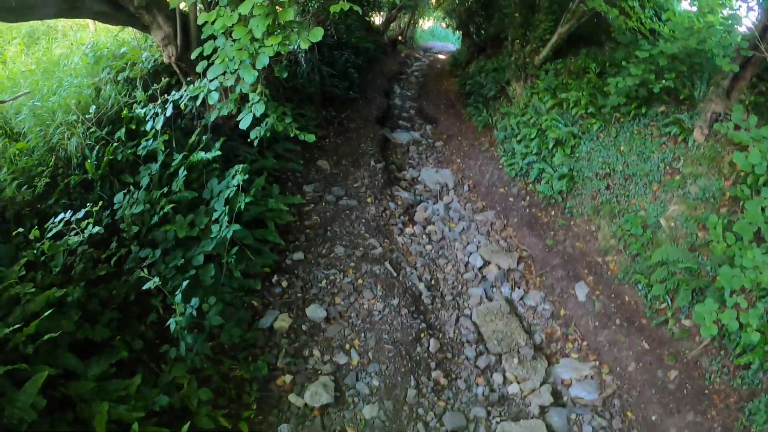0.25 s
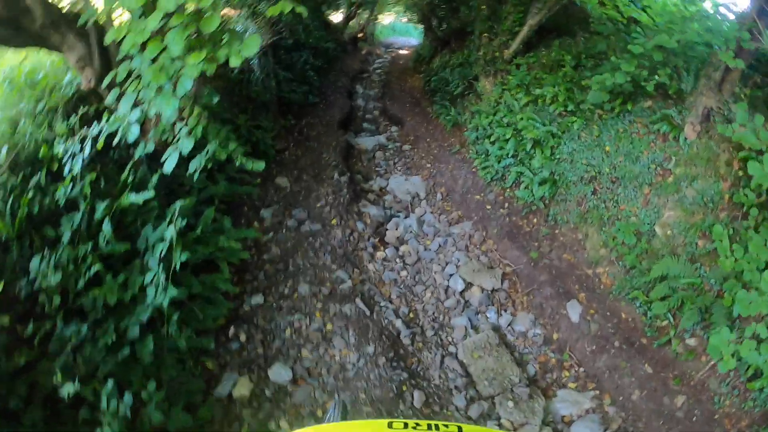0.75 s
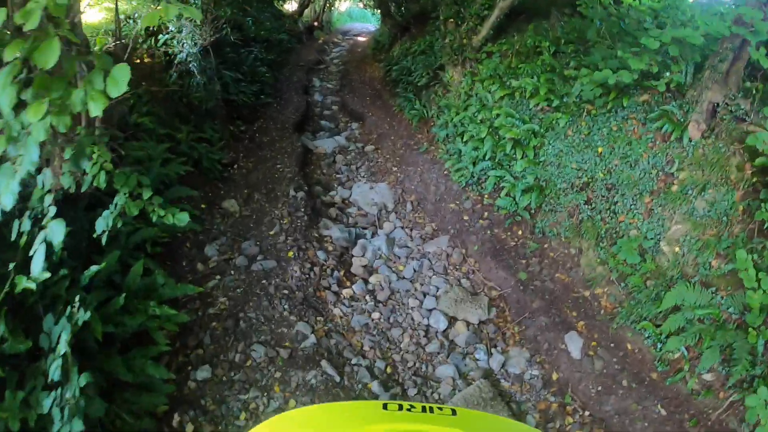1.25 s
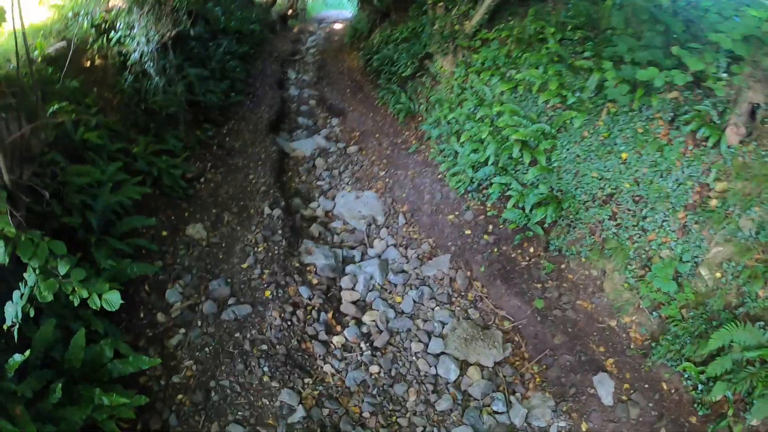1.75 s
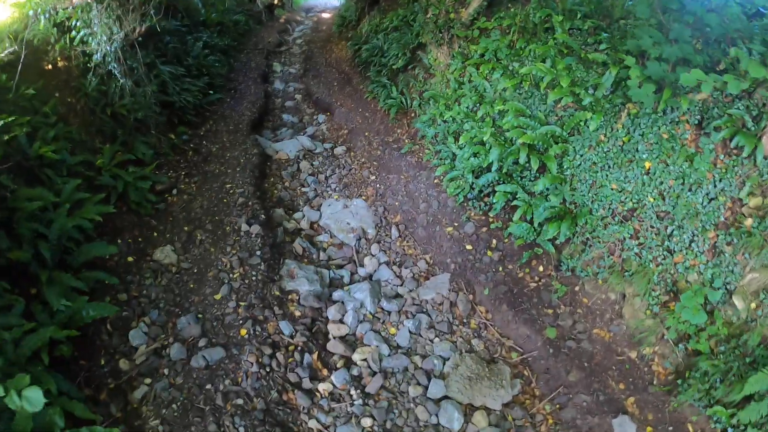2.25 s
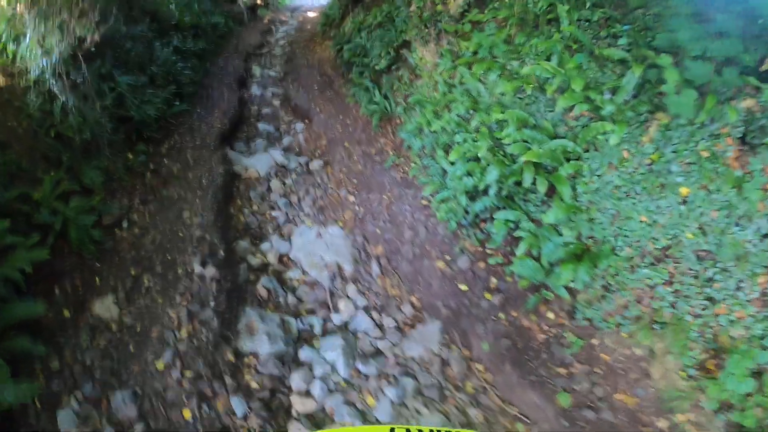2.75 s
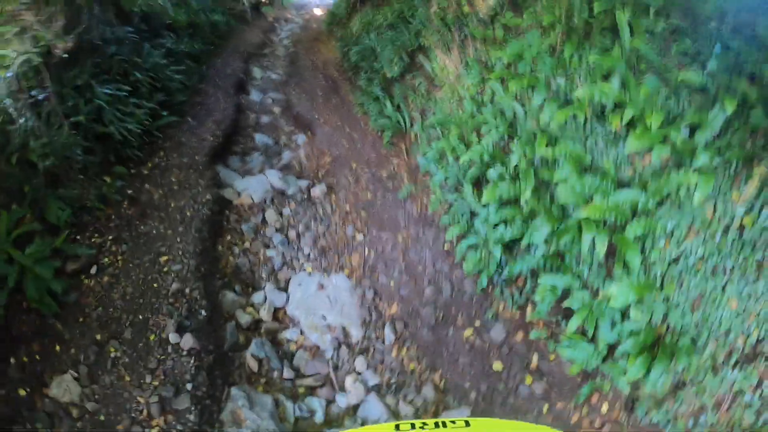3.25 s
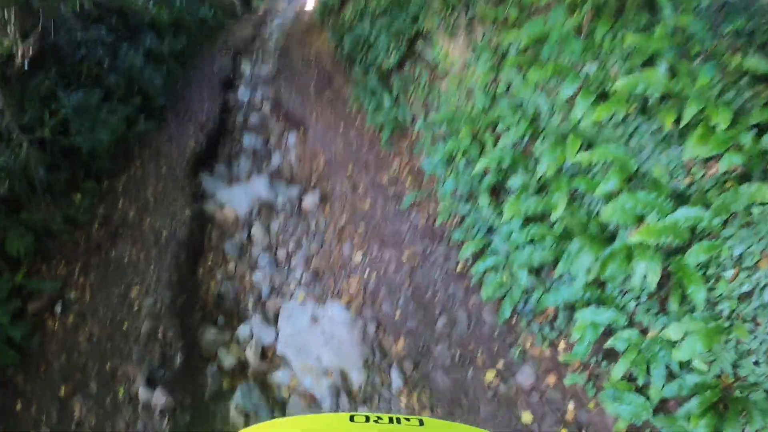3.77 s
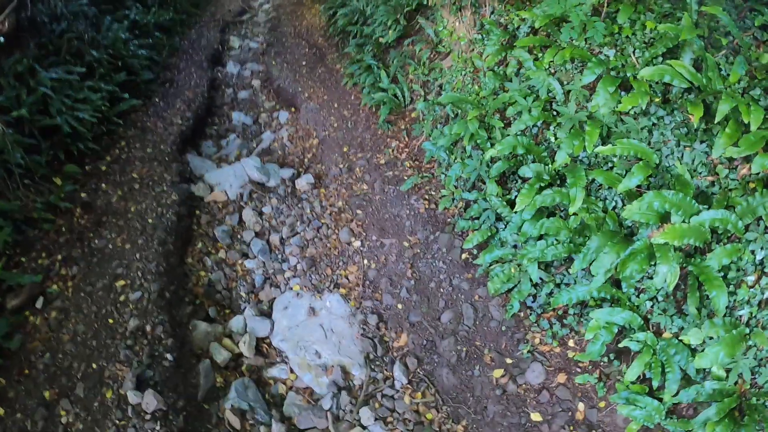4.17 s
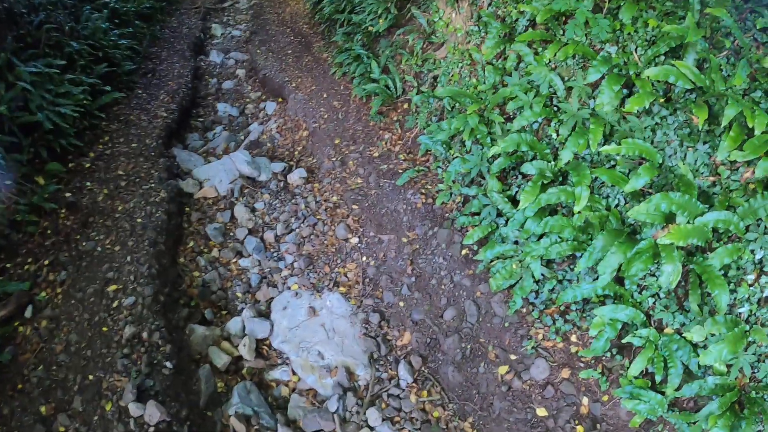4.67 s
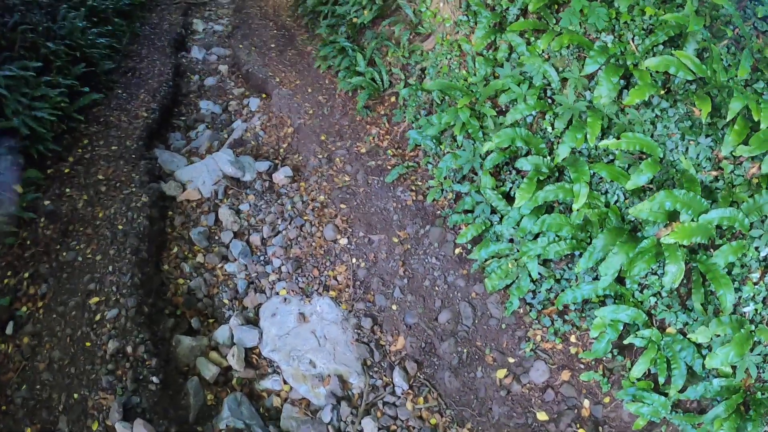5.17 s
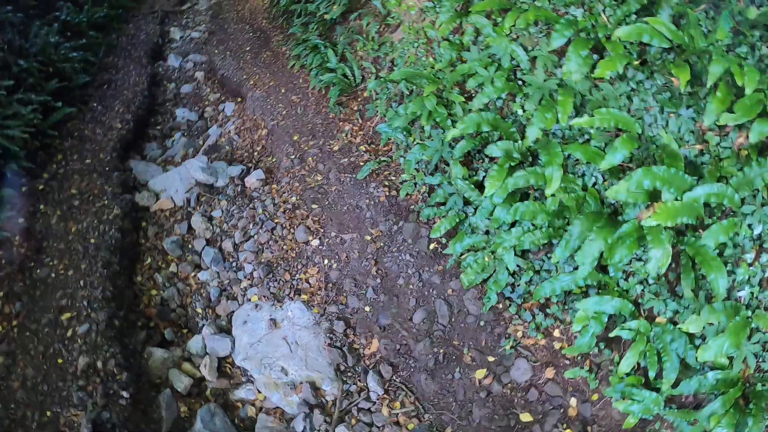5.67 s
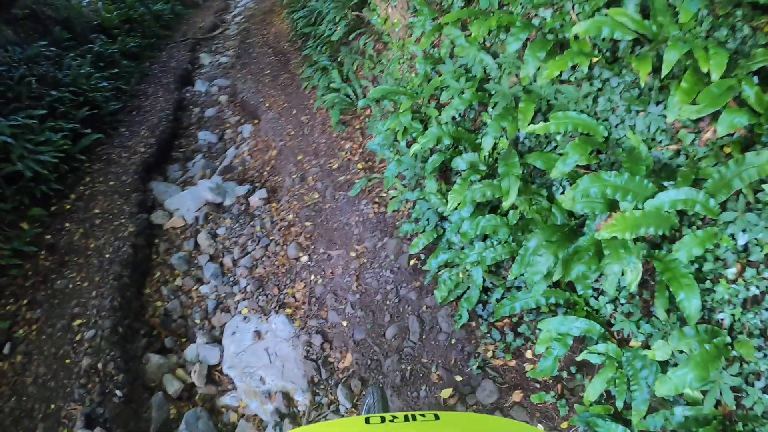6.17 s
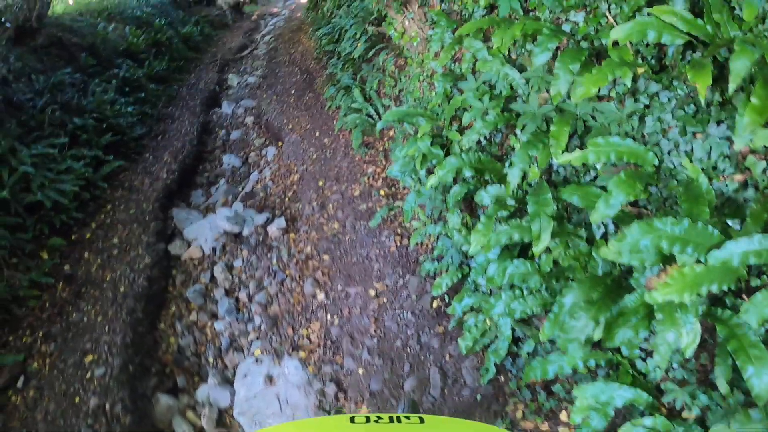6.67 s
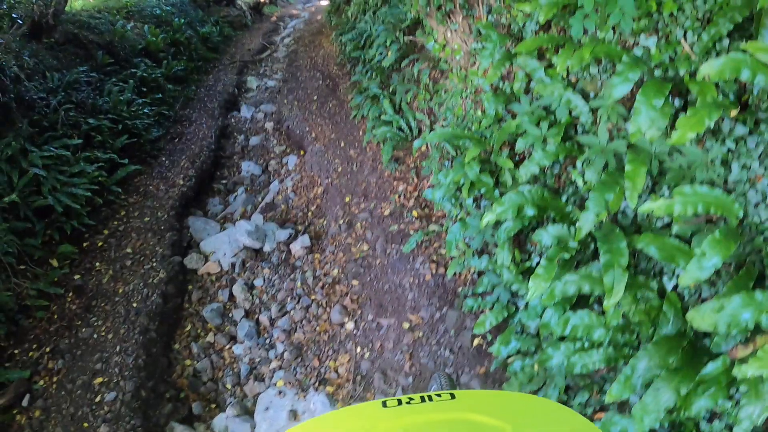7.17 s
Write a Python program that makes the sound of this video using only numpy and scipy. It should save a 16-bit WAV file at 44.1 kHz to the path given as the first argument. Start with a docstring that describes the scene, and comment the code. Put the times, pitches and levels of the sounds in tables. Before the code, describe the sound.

A mountain bike picks its way over loose stones on a wooded track. Irregular hard knocks ring the bike briefly, with dull chatter, pebble ticks, tyre thuds and gravel crunch. A dense opening burst eases, a longer busy one follows, then only scattered clacks while a small bird whistles faintly. Close microphones on the rider pick up a deep lumpy rumble of air and shaking.

```python
"""Stones clack against a mountain bike as it picks its way down a rocky gully; the rider wears two microphones.
Each knock is a jerky burst of noise that rings the bike; pebbles, loose parts and squeaks add small sounds.
The tyres thud as decaying low tones, and crunch and drum as showers of clicks coloured by filters.
Air and shaking rumble underneath as low-filtered clicks.
Towards the end a small bird sings faintly in the trees, as gliding tones with an echo of fading noise."""
import sys
import numpy as np
from scipy import signal
from scipy.fft import rfft, irfft, next_fast_len
from scipy.io import wavfile
from scipy.ndimage import uniform_filter1d

SR = 44100
rng = np.random.default_rng(int(sys.argv[2]) if len(sys.argv) > 2 else 0)


def unload_wav(signal):
    """Save mono or channel-first audio to the path in sys.argv[1] as 16-bit WAV at rate SR, clipped to [-1, 1]."""
    wavfile.write(
        sys.argv[1],
        SR,
        np.round(np.clip(np.atleast_2d(signal).T, -1, 1) * 32767).astype(np.int16),
    )


N = 327222
TIME = np.arange(N) / SR


# stones knocking the bike: (t/s, clack level/dB, deep body over clack/dB, click over clack/dB,
# contact/ms, f/Hz at which the struck spot answers most)
STONE_KNOCKS = [(0.2748, -43.5, 0, -7, 3.3, 1180), (0.425, -32, -2, -10.5, 3.4, 1235),
                (0.4536, -42.5, -12, -3.5, 1.1, 1295), (0.5311, -28.5, -6.5, -12, 2, 1217),
                (0.6498, -28, -9.5, -7.5, 2.5, 1160), (0.6792, -36.5, 3.5, -9.5, 1.2, 1050),
                (0.7165, -25.5, 1.5, -6, 3.3, 1107), (0.878, -27.5, 2.5, -13, 9.5, 1140),
                (0.898, -37.5, 2, -5, 3.2, 1337), (0.9713, -36.5, 3.5, -22, 4.9, 1090.0),
                (1.06, -35.5, 0.5, -9, 6.5, 1683), (1.0756, -27.5, -2, -15, 5.7, 920),
                (1.1386, -41, 3.5, -11.5, 8.5, 1032), (1.3004, -39, -4.5, -17, 0.94, 1080),
                (1.3319, -32, -3, -14.5, 2.7, 1008), (1.5222, -34, 5, -12.5, 3.26, 1176),
                (2.652, -33.5, -3, -12, 2.9, 706), (2.7854, -37.5, 0, -15, 4.9, 1017),
                (2.8511, -33.5, 0, -7.5, 8.5, 816), (2.8745, -28.5, 0.5, -6.5, 4.55, 1148),
                (2.968, -45, 8, -8.5, 9.5, 1140), (3.0046, -32.5, 1, -13, 4.1, 1210),
                (3.1301, -39, 3.5, -11, 2.5, 1140), (3.22, -33.5, -3.5, -5, 1.4, 1290),
                (3.2437, -32.5, 6, -10.5, 5.9, 1040), (3.2989, -33, 3.5, -12.5, 2.2, 937),
                (3.3955, -34, -14.5, -10, 0.97, 1200), (3.4012, -37.5, 9, -15, 7.8, 903),
                (3.4294, -30.5, 5.5, -12.5, 10, 1236), (3.4946, -38.5, -2.5, -46, 5.4, 1290),
                (3.609, -38, 4, -11.5, 3.1, 1270), (3.645, -34, 5.5, -13, 4.2, 1170),
                (3.6875, -27, 0, -10, 3, 1150), (3.696, -35, 11, -16.5, 8.3, 1070),
                (3.8222, -36, 5, -35, 4.6, 975), (3.922, -38, 7.5, -8, 1.7, 1200),
                (3.9768, -37.5, -5.5, -10, 3.5, 1250), (4, -40.5, -1.5, -8.5, 5, 1280),
                (4.0495, -41.5, 9.5, -9.5, 1.4, 1000), (4.06, -43.5, 7.5, -17, 4.4, 990),
                (4.0902, -45.5, -1.5, -4, 4.4, 1030), (4.1307, -43.5, 10, -0.5, 3.5, 1055),
                (4.16, -40.5, 0, -6.5, 1.3, 1310), (4.2438, -37.5, 0.5, -9, 2.95, 986),
                (4.4122, -32, -3, -12, 3.6, 1060), (4.9068, -34.5, -0.5, -16, 2.4, 1140),
                (5.1967, -27.5, -10, -9, 1.9, 1324), (5.3694, -30.5, -3, -8.5, 2.44, 1310),
                (6.044, -36.5, -0.5, -9, 4.7, 1020), (6.2649, -39.5, -3, -12.5, 7.7, 1160),
                (6.687, -35, -21.5, -2.5, 1.07, 1360), (6.74, -40.5, -3, -9, 1.1, 1280),
                (6.769, -43.5, 8.5, -19, 1.4, 940), (6.9717, -38.5, -14, -4, 1.9, 1260),
                (7.096, -36, -0.5, -11.5, 2.7, 1140), (7.128, -28.5, -3, -4.5, 3.1, 910),
                (7.3983, -40.5, 8, -15, 4.2, 957)]


def knocks(rise=0.12, jagged=0.68, tail_db=-17, tail_s=0.019, tail_hz=1150, dense_db=-3,
           scuff_db=-28, scuff_stretch=3, approach_db=-5, spot_db=3, spot_q=4.4, apart=0.34,
           graze_s=0.0069, graze_db=-25.5, restrike_s=0.003, restrike_db=-14):
    """Each stone cracks against the bike, grinds in jerks for a few milliseconds and rings it; a shudder follows."""
    size, lead, blow_end = 6144, 2000, 3100  # samples; the strike begins at lead
    t = (np.arange(size) - lead) / SR
    f = np.fft.rfftfreq(size, 1 / SR)
    after = np.maximum(t, 0)
    edges_hz = ((135, 600), (600, 2200), (2200, 8000))  # body, clack, click
    bands = [signal.butter(4, edges, "band", fs=SR, output="sos") for edges in edges_hz]
    out = np.zeros((2, N))
    for s, db, weight, click_over, contact_ms, spot_hz in STONE_KNOCKS:
        contact = contact_ms / 1000
        onset = (1 - np.exp(-after / (rise * contact))) ** 2
        strike = onset * np.exp(-after / contact)

        # the stone grazes the bike just before it strikes, and strikes again just after
        early, late = (rng.uniform(0.68, 1.5, 2) * [graze_s, restrike_s] * SR).astype(int)
        graze = undb(graze_db) * np.roll(strike, -early)
        restrike = undb(restrike_db) * np.roll(strike, late)
        force = strike + graze + restrike

        # a stone that grinds longer also drags longer, mostly after the blow
        scuff = undb(scuff_db + approach_db * (t < 0)) * np.exp(-np.abs(t) / (scuff_stretch * contact))
        catches = np.repeat(rng.standard_normal(size // 32), 32)
        noise = pair(rng.standard_normal((3, size)), apart)
        push = noise * np.exp(jagged * catches) * (force / force.max() + scuff)

        # rubber and plastic soak up the treble, so only the lows shudder on
        shudder = pair(rng.standard_normal((3, size)), apart) * undb(tail_db) * onset * np.exp(-after / tail_s)
        spot = 1 + undb(spot_db) / (1 + 1j * spot_q * (f / spot_hz - spot_hz / (f + 1)))
        ring = bike(f)
        # the shudder spreads to many loose parts, which fill the gaps between the modes
        loose = (ring + undb(dense_db)) / (1 + 1j * f / tail_hz - (f / tail_hz) ** 2) ** 2
        blow = irfft(rfft(push) * ring * spot + rfft(shudder) * loose)

        body, clack, click = (signal.sosfilt(band, blow) for band in bands)
        # the deep body reaches both microphones alike
        for part, part_db in ((body[:1], weight), (clack, 0), (click, click_over)):
            rms = np.sqrt(np.mean(part[:, lead:blow_end] ** 2))
            add(out, s - lead / SR, undb(db + part_db) * part / rms)
    return out


# what the bike rings with, before each blow scatters it: (f/Hz, width/Hz, level/dB)
BIKE_MODES = [(162.4, 43.5, 10), (402, 41, -6.5), (712, 70, -9.5), (808, 43, -1.5), (936, 70, 2),
              (1160, 108, 10), (1488, 104, 7), (2570, 300, -1.5), (3325, 120, 2), (3926, 290, -3),
              (4515, 160, 1)]


def bike(f, scatter_db=2.5, detune=0.039, crack_db=-18):
    """The bike's answer to one blow: ringing modes, randomly shifted and weighted as for a new spot each time."""
    hz, width, db = np.transpose(BIKE_MODES)[:, :, None]
    f = f + 1  # avoids dividing by zero
    centre = hz * (1 + detune * rng.standard_normal(hz.shape))
    gain = undb(db + scatter_db * rng.standard_normal(hz.shape))
    ring = np.sum(gain / (1 + 1j * (f / centre - centre / f) * centre / width), axis=0)
    crack = undb(crack_db) / (1 + 1j * f / 1500)
    return (ring + crack) / (1 + 1j * f / 5800 - (f / 5800) ** 2) ** 2


# pebbles flicked lightly against the bike: (t/s, level/dB)
FLICKED_PEBBLES = [(0.613, -55), (0.763, -55), (0.813, -64), (0.934, -56.5), (1.164, -52), (1.199, -52),
                   (1.893, -48.5), (2.091, -54.5), (2.275, -61), (2.58, -53), (3.176, -53), (3.21, -50),
                   (3.289, -46), (3.861, -41.5), (3.895, -49.5), (4.073, -48), (4.204, -57.5), (4.322, -63),
                   (5.179, -50.5), (5.229, -58.5), (5.899, -48.5), (5.916, -51), (6.172, -49.5),
                   (6.374, -60), (6.523, -50), (6.905, -53.5)]


def pebbles(contact_s=0.0018, centre_hz=1800, q=0.75, apart=0.6):
    """A flicked pebble is too light to stir the deep body: only a thin, dry tick."""
    def thin(f):
        return 1 / (1 + 1j * q * (f / centre_hz - centre_hz / f))
    out = np.zeros((2, N))
    for s, db in FLICKED_PEBBLES:
        add(out, s, undb(db) * tap(contact_s, apart, thin))
    return out


def tap(contact_s, apart, tone):
    """One light touch on the bike: a short noise push rings it, coloured by tone(Hz), at rms 1."""
    t = TIME[:2048]
    f = np.fft.rfftfreq(len(t), 1 / SR)
    push = pair(rng.standard_normal((3, len(t))), apart) * t * np.exp(-t / contact_s)
    return unit(irfft(rfft(push) * bike(f) * tone(f + 1)))


def chatter(rattle_db=2.5, spread_db=4, contact_s=0.0033, crowding=0.85, apart=0.069, dull_hz=1900, count=260):
    """Grit, chain and cables tap the bike dully and at random, harder and more often on rougher ground."""
    def dull(f):
        return 1 / (1 + 1j * f / dull_hz)
    roll = curves(STONY_GROUND)[0]
    stones_passed = np.cumsum(undb(crowding * roll))
    out = np.zeros((2, N))
    for i in np.searchsorted(stones_passed, stones_passed[-1] * rng.random(count)):
        level_db = roll[i] + rattle_db - spread_db * rng.exponential()
        add(out, i / SR, tap(contact_s, apart, dull) * undb(level_db))
    return out


# the tyres landing: (t/s, level/dB before thud_db, f/Hz)
LANDINGS = [(.005, -12, 58.2), (0.274, -8.5, 60), (0.354, -12, 68), (0.715, -27, 151.6),
            (0.727, -8.5, 61.5), (1.086, -15.5, 64.3), (1.207, -9.5, 54.8), (1.524, -13, 74.2),
            (2.787, -23, 148), (2.872, -9, 59.6), (3.217, -12.5, 60.6), (3.269, -14, 59),
            (3.399, -16.5, 174.5), (3.453, -12, 72.4), (3.686, -14.5, 71), (3.701, -23, 195),
            (3.756, -12, 68.5), (3.798, -33, 183), (3.845, -9.5, 51.2), (4.057, -19.5, 168.6),
            (4.247, -29.5, 187.6), (6.025, -15, 46)]


def thuds(swell_s=0.017, cycles=0.94, thud_db=-1, overtone=2.116, overtone_db=-12):
    """A landing shakes the whole bike for a few cycles; higher thuds and overtones die sooner."""
    out, t = np.zeros(N), np.arange(SR // 4) / SR
    for s, db, hz in LANDINGS:
        age = t / ((swell_s + cycles / hz) / 2)  # 1 at the strongest moment
        turn = 2 * np.pi * hz * t
        upper = undb(overtone_db) * np.exp((1 - age) / 2) * np.sin(overtone * turn)
        shake = np.sin(turn) + upper
        add(out, s, undb(db + thud_db) * (age * np.exp(1 - age)) ** 2 * shake)
    return out


# short squeaks on the bike: (t/s, level/dB, f/Hz, length/s as a time scale)
RUBBING_PARTS = [(0.076, -45.5, 1850, 0.027), (7.022, -26.5, 1603, 0.013), (7.036, -49.5, 1690, 0.052)]


def squeaks(rough=0.03, fall=0.08):
    """Two parts rub for an instant at a slightly wavering, quickly falling pitch."""
    out, t = np.zeros(N), TIME[:SR // 8]
    for s, db, hz, length in RUBBING_PARTS:
        age = t / length
        waver = rough * walk(per_s=580)[:len(t)]
        pitch = hz * (1 + fall * (0.5 - np.minimum(age, 2)) + waver)
        swell = 5 * age * np.exp(-3 * age ** 2)
        add(out, s, undb(db) * swell * np.sin(2 * np.pi * np.cumsum(pitch) / SR))
    return out


# how stony the ground under the tyres is: (t/s, level/dB before the settings below)
STONY_GROUND = [(0, -55.5), (0.36, -65.5), (0.8, -60), (1.6, -68), (2.02, -70.5), (2.18, -63.5),
                (2.56, -70.5), (2.68, -54.5), (3.09, -60.5), (3.25, -53), (3.55, -60), (3.7, -46.5),
                (4.05, -57), (4.3, -73), (4.55, -81), (4.78, -80.5), (4.9, -73), (5.57, -74.5), (6.05, -64),
                (7.42, -65.5)]
# colour of gravel cracking under the tread: (f/Hz, level/dB)
CRUNCH_COLOUR = [(1000, -14), (2100, -7), (3350, -7), (4850, -5), (5600, -9), (6300, -22), (7400, -24),
                 (8400, -47.5)]
# colour of larger pebbles shifting: (f/Hz, level/dB)
ROLLING_COLOUR = [(300, -30), (580, -4.5), (900, -9), (1200, -0.5), (1750, 0), (2050, -18), (3000, -29.5)]
# colour of the drumming tyre casing: (f/Hz, level/dB)
DRUMMING_COLOUR = [(60, -11.5), (110, -4), (170, 4), (280, -12.5), (410, -15.5), (520, -30.5), (800, -48.5),
                   (1600, -60)]


def tyres(crunch_db=-9.5, crunch_growth=0.61, roll_db=2.0, drum_db=6.5, jerky_db=5, apart=1.0):
    """Gravel cracks under the tread in quick jerks, larger pebbles shift and the casing drums."""
    ground, roll = curves(STONY_GROUND)[0], stirred()
    # the stonier the ground, the jerkier the sound
    jerks = jerky_db * (ground - ground.min()) / np.ptp(ground) * walk(per_s=9.3)
    grit = colour(pair(grains(per_s=2600, spread_db=3), apart), CRUNCH_COLOUR)
    shifting = colour(pair(grains(per_s=800, spread_db=3.5), apart), ROLLING_COLOUR)
    casing = colour(grains(per_s=310, spread_db=-2.0)[0], DRUMMING_COLOUR)
    # the crunch grows more slowly than the stoniness
    crunch = ground.max() + crunch_growth * (ground - ground.max())
    steady = undb(crunch + crunch_db) * grit
    steady = steady + undb(roll + roll_db) * shifting
    steady = steady + undb(roll + drum_db) * casing
    return undb(jerks) * steady + slides() * grit


def stirred(spray_db=-19.5, settle_s=0.028):
    """Level of the moving gravel in dB: the stony ground, plus gravel thrown up by each knock, which settles."""
    power, t = undb(curves(STONY_GROUND)[0]) ** 2, TIME[:SR // 2]
    for s, db, *_ in STONE_KNOCKS:
        spray = undb(db + spray_db) * np.exp(-t / settle_s)
        add(power, s, spray ** 2)
    return 10 * np.log10(power)


# a tyre slides through loose gravel: (t/s, length/s, crunch level/dB)
TYRE_SLIDES = [(0.17, 0.16, -60), (2.612, 0.064, -48), (2.698, 0.13, -48), (3.285, 0.046, -47),
               (3.635, 0.14, -40), (7.277, 0.071, -55)]


def slides():
    """Strength of the extra crunch while a tyre slips: it swells and dies away."""
    out = np.zeros(N)
    for s, length, db in TYRE_SLIDES:
        add(out, s, undb(db) * np.sin(np.linspace(0, np.pi, int(length * SR))))
    return out


# air and shaking: (t/s, level/dB before rumble_db and the lumps)
SHAKING = [(0, -27.5), (1.0, -21), (1.8, -29.5), (2.55, -28.5), (2.85, -17.5), (3.25, -20), (3.8, -18.5),
           (4.6, -37.5), (5.1, -32.5), (5.3, -22.5), (5.55, -30), (6.05, -21.5), (6.45, -31), (6.8, -21.5),
           (7.0, -27.5), (7.42, -25)]
# colour of the air and shaking: (f/Hz, level/dB)
RUMBLE_COLOUR = [(5, -10), (12, 8.5), (20, -7), (47, -8), (60, -5), (75, -13), (95, -24), (140, -35.5),
                 (260, -68.5), (600, -83.5)]


def rumble(rumble_db=2, lumpy_db=1.0, apart=0.024):
    """Air and shaking press on both microphones nearly alike, in lumps, as strongly as the ride jolts."""
    jolts = grains(per_s=140, spread_db=2.5)
    x = colour(pair(jolts, apart), RUMBLE_COLOUR)
    # even out the level over an eighth of a second, so that the table sets it
    x = x / np.sqrt(uniform_filter1d(x[0] ** 2, size=SR // 8))
    return x * undb(curves(SHAKING)[0] + rumble_db + lumpy_db * walk(per_s=5.8))


# bird notes: (t/s, length/s, start f/Hz, end f/Hz, level/dB before the settings below)
BIRD_NOTES = [(5.421, 0.11, 5540, 4950, -60), (5.59, 0.083, 4800, 4550, -67.5),
              (5.77, 0.047, 3460, 4270, -59), (5.871, 0.038, 5430, 4670, -55.5),
              (6.078, 0.056, 6750, 5940, -67), (6.133, 0.027, 5120, 4700, -52),
              (6.234, 0.13, 5670, 5100, -52), (6.408, 0.017, 6440, 6160, -62.5),
              (6.49, 0.11, 3090, 3320, -62), (6.64, 0.086, 4576, 4866, -48.5),
              (6.945, 0.024, 5020, 4680, -51.5), (7.085, 0.087, 5780, 4800, -52.5),
              (7.315, 0.042, 5260, 4560, -50.5)]


def bird(waver=0.012, wood_t60_s=0.38, direct_db=-4, bird_db=1):
    """Thin gliding whistles that swell towards their end, far off and smeared by the trees."""
    song, wobble = np.zeros(N), walk(per_s=250)
    for s, length, start_hz, end_hz, db in BIRD_NOTES:
        u = np.linspace(0, 1, int(length * SR))
        glide = start_hz + (end_hz - start_hz) * u ** 2
        hz = glide * (1 + waver * np.roll(wobble, -int(s * SR))[:len(u)])
        swell = np.sqrt(2 * u * np.abs(np.sin(np.pi * u)))
        add(song, s, undb(db + bird_db) * swell * np.sin(2 * np.pi * np.cumsum(hz) / SR))
    # the echo fades by 60 dB in wood_t60_s
    wood = rng.standard_normal((2, SR)) * np.exp(-np.log(1000) * TIME[:SR] / wood_t60_s)
    echo = signal.fftconvolve(song[None], unit(wood) / np.sqrt(SR), axes=1)[:, :N]
    return undb(direct_db) * song + echo


def undb(db):
    """Decibels to gain."""
    return 10 ** (np.asarray(db) / 20)


def unit(x):
    """Scale to rms 1."""
    return x / np.sqrt(np.mean(x ** 2))


def curves(table):
    """The columns of a table of (t/s, ..), joined by straight lines over time."""
    s, *columns = np.transpose(table)
    return [np.interp(TIME, s, c) for c in columns]


def along(points, hz):
    """Read (f/Hz, value) points on a log-frequency axis."""
    f, value = np.transpose(points)
    return np.interp(np.log(hz + 1), np.log(f), value)


def shape(x, response):
    """Filter by a function of frequency."""
    size = next_fast_len(N + 8192)
    return irfft(rfft(x, size) * response(np.fft.rfftfreq(size, 1 / SR)), size)[..., :N]


def colour(x, spectrum):
    """Filter x by a table of (f/Hz, level/dB), at rms 1."""
    return unit(shape(x, lambda hz: undb(along(spectrum, hz))))


def add(out, s, sound):
    """Mix a sound in at time s."""
    i = max(int(s * SR), 0)
    out[..., i:i + sound.shape[-1]] += sound[..., :N - i]


def pair(x, apart):
    """Three unrelated signals to two channels that share the first."""
    return (x[0] + apart * x[1:]) / np.sqrt(1 + apart ** 2)


def grains(per_s, spread_db):
    """Random clicks: a few are much larger than most, or much smaller if spread_db is negative."""
    size = undb(spread_db * np.minimum(rng.exponential(size=(3, N)), 4))
    happens = rng.random((3, N)) < per_s / SR
    return unit(happens * size * rng.choice([-1, 1], (3, N)))


def walk(per_s):
    """A smooth random wander at rms 1, with little movement faster than per_s (Hz)."""
    return unit(shape(rng.standard_normal(N), lambda hz: 1 / (1 + (hz / per_s) ** 4)))


def scene():
    """Knocks, ticks, chatter and thuds of the bike, the ground under its tyres, the air and a bird."""
    on_bike = knocks() + pebbles() + chatter() + thuds() + squeaks()
    return on_bike + tyres() + rumble() + bird()


# level of the left microphone port over the right: (f/Hz, level/dB)
PORT_TILT = [(300, 0.85), (440, -0.5), (530, 15.5), (640, -5), (760, 13.5), (1000, -2.5), (1420, 5.5),
             (2000, -2), (2450, 4.5), (3550, 5.5), (4300, 1.5), (4900, -18), (6500, 2)]
# phase by which the left port leads the right: (f/Hz, lead/radians)
PORT_PHASE = [(200, 0), (480, 1), (750, .7), (1100, -.3), (2000, -.5), (2300, -2), (2750, -.3), (3700, -.3),
              (4700, -3.8)]


def record(dry, top_hz=8000):
    """Each microphone port colours the sound in its own way; the top is cut."""
    def ports(hz):
        tilt, lead = undb(along(PORT_TILT, hz)), along(PORT_PHASE, hz)
        # the two ports' powers always add up to the same total
        return np.array([tilt, np.exp(-1j * lead)]) * np.sqrt(2 / (1 + tilt ** 2))
    top_cut = signal.ellip(6, 0.3, 26, top_hz, fs=SR, output="sos")
    return signal.sosfilt(top_cut, shape(dry, ports))


dry = scene()
out = record(dry)
unload_wav(out)
```